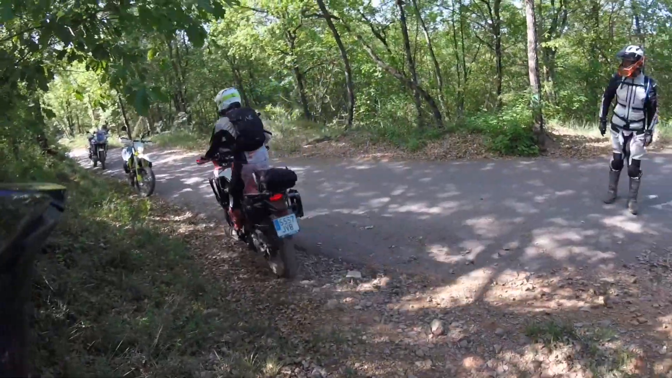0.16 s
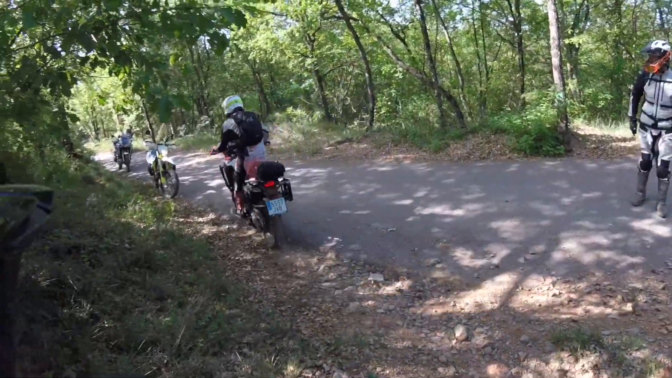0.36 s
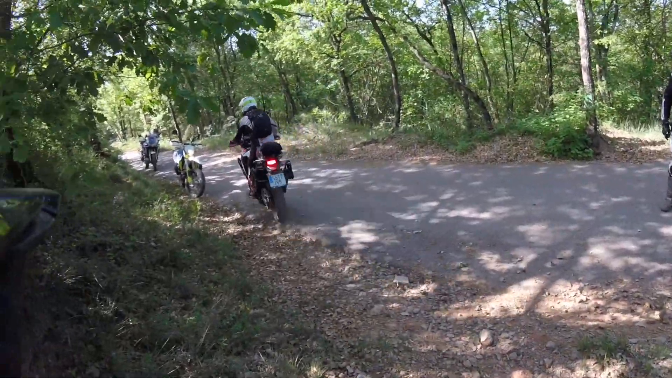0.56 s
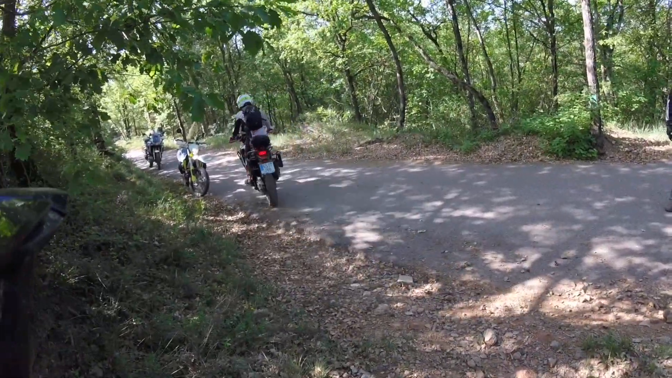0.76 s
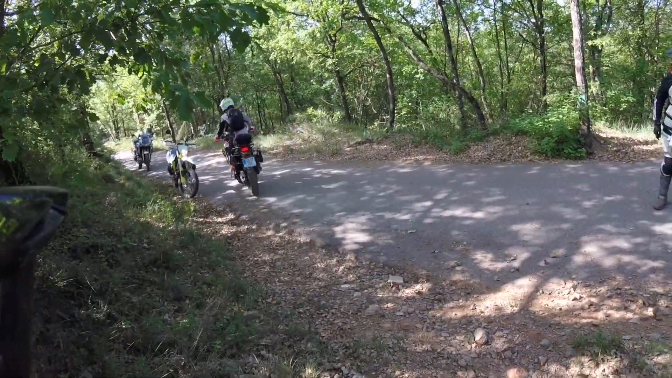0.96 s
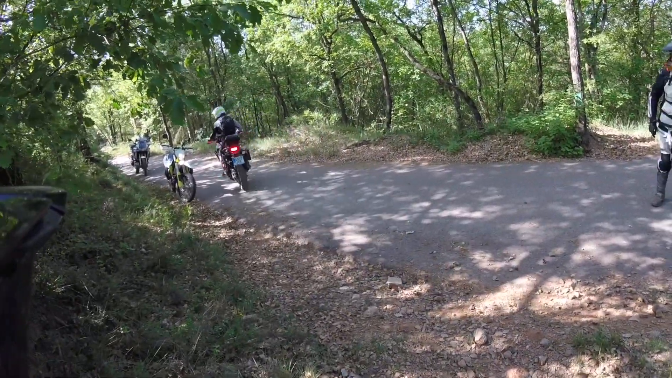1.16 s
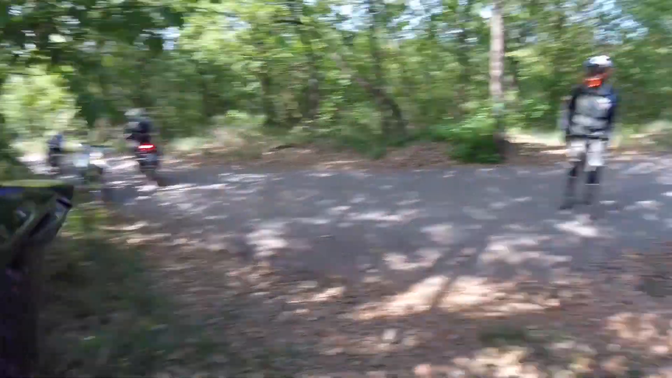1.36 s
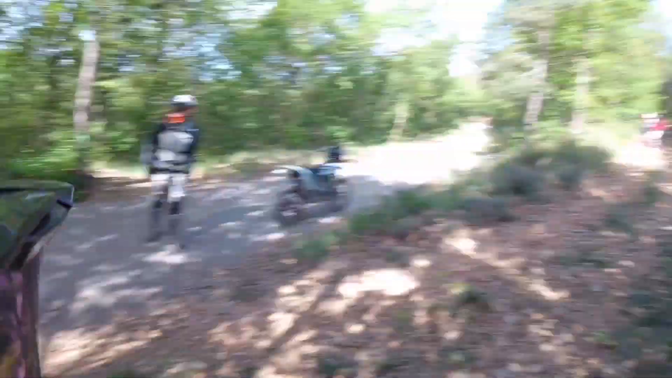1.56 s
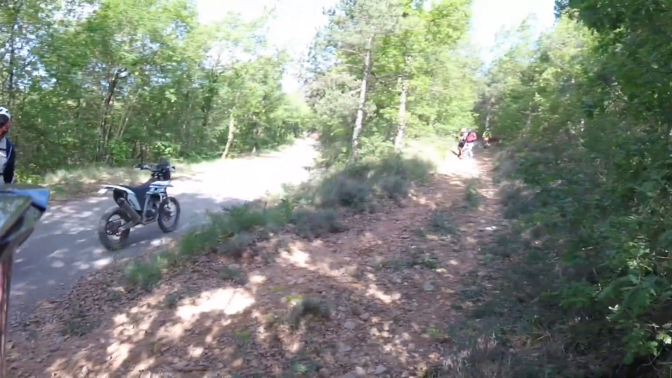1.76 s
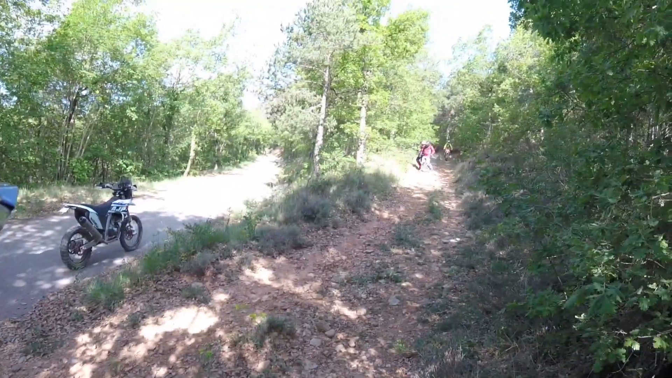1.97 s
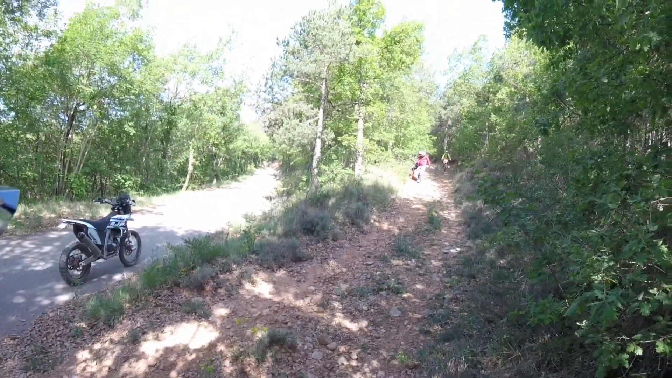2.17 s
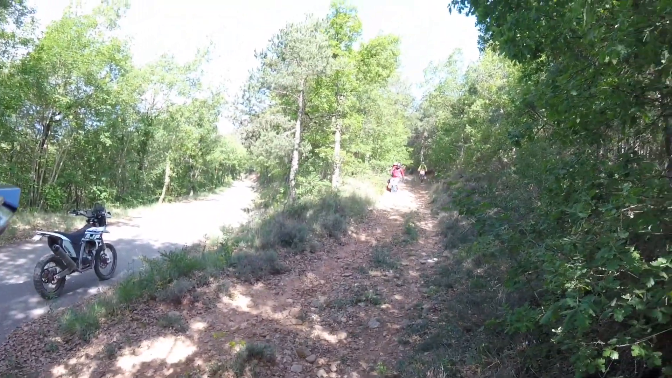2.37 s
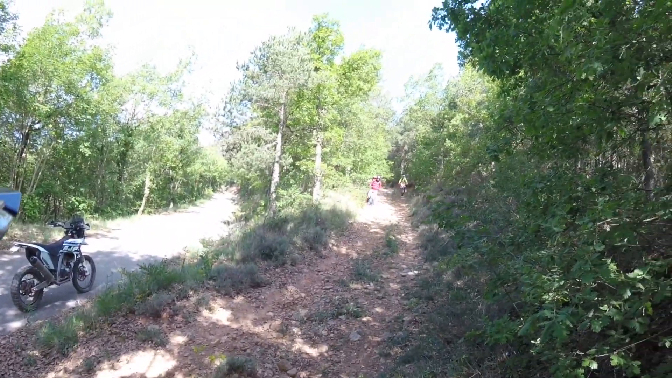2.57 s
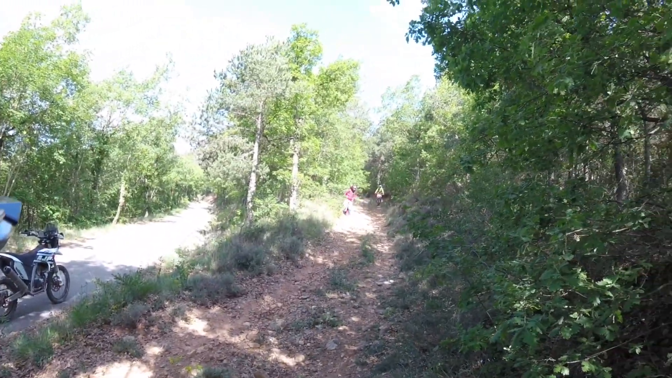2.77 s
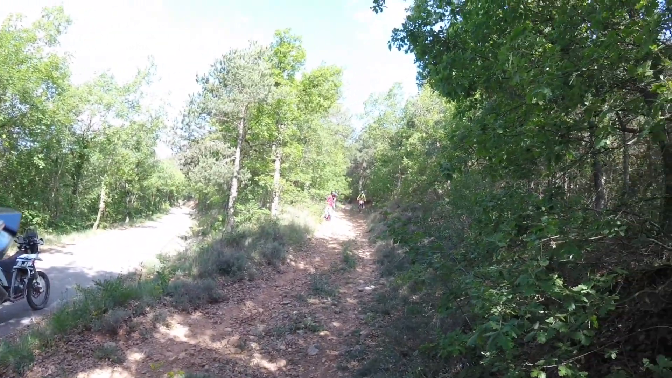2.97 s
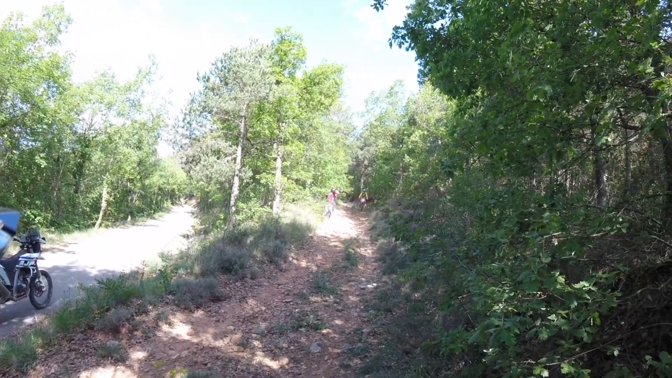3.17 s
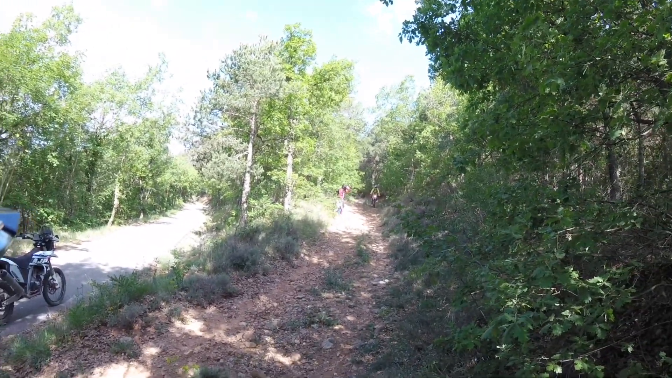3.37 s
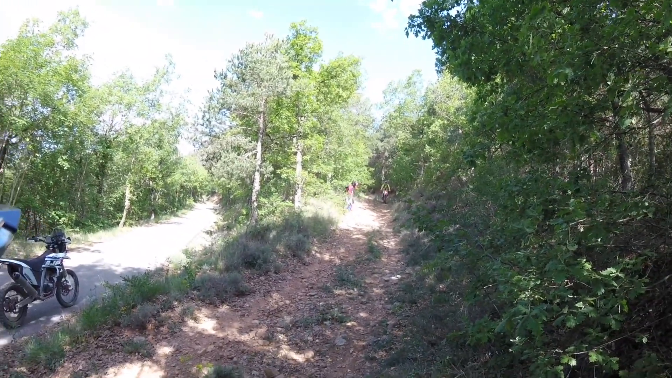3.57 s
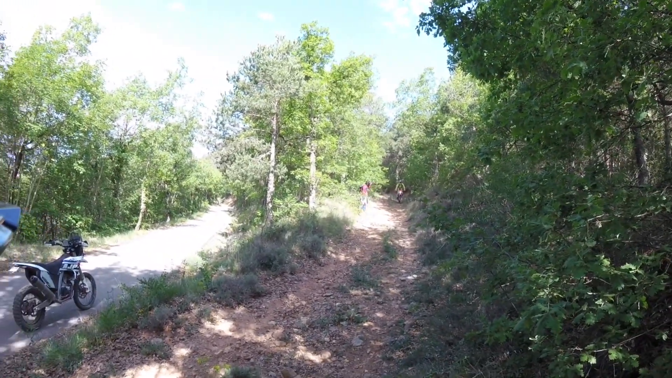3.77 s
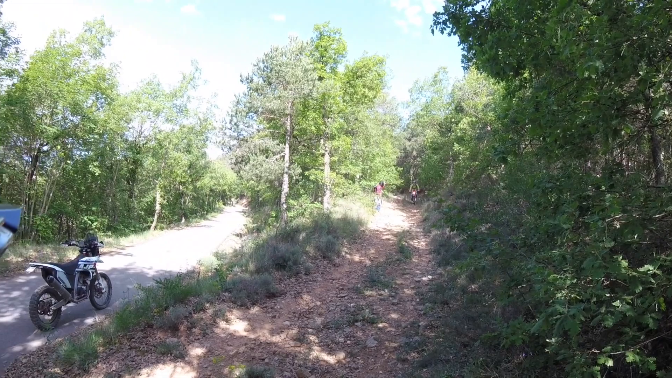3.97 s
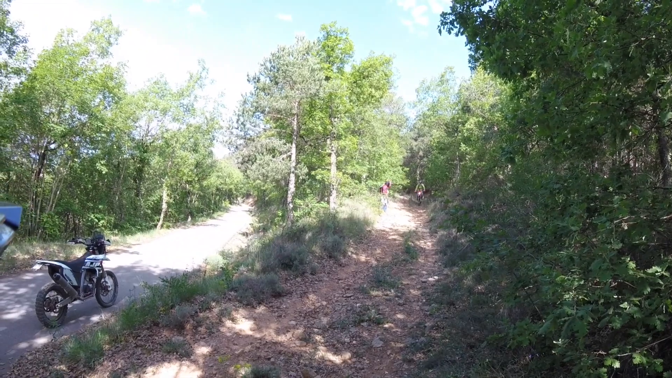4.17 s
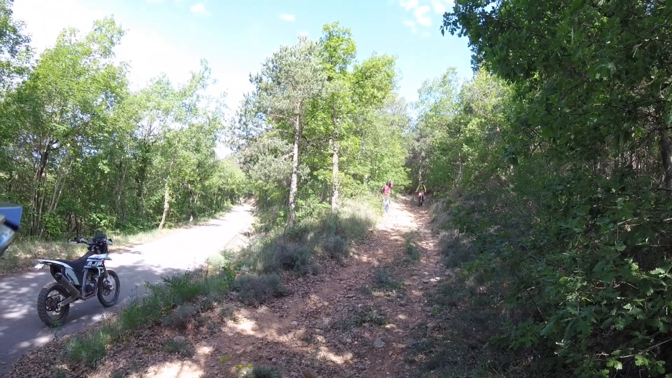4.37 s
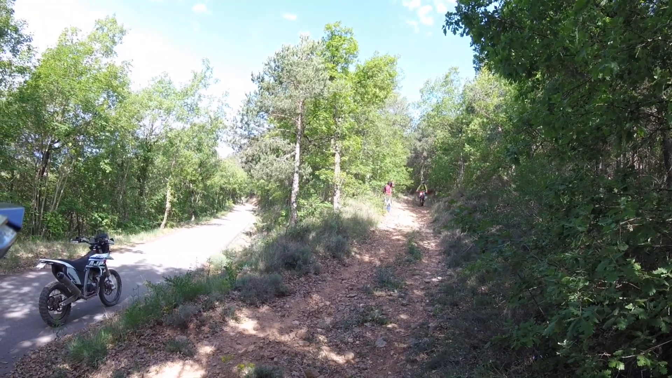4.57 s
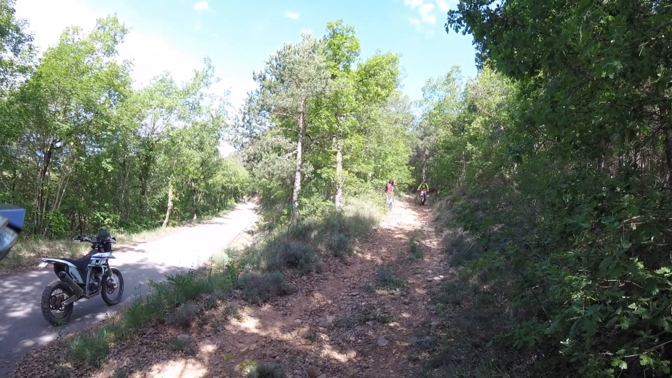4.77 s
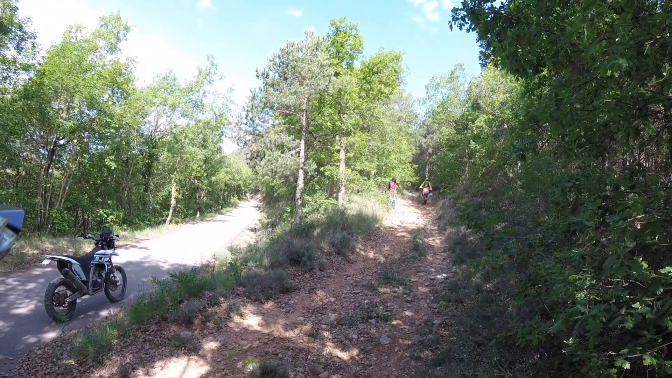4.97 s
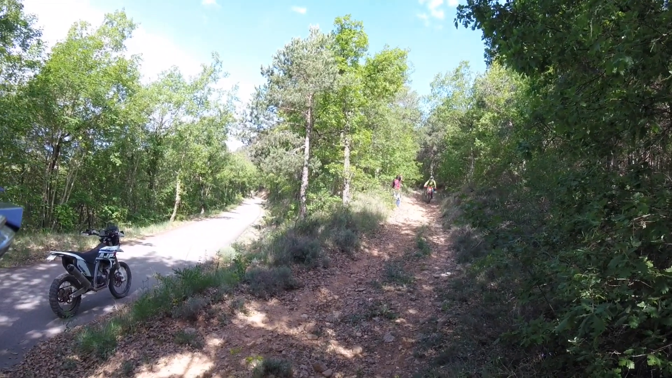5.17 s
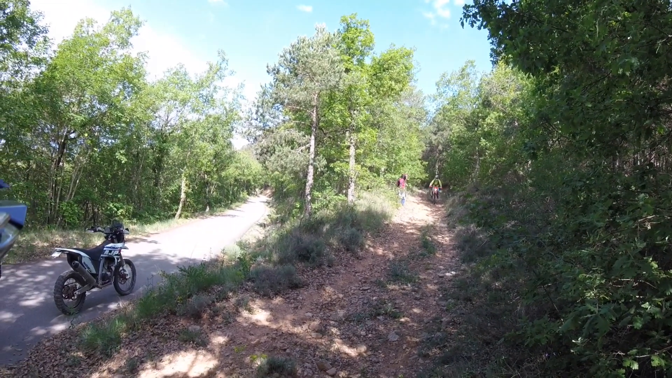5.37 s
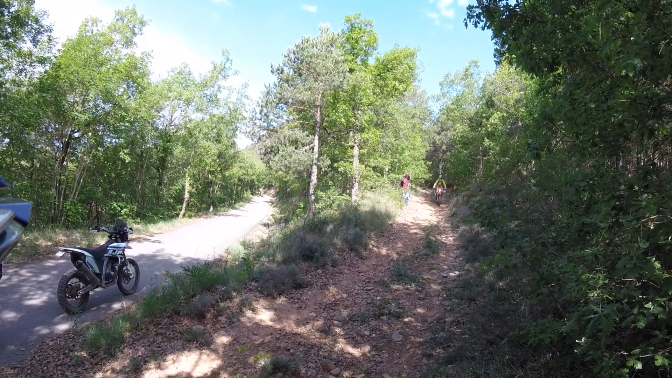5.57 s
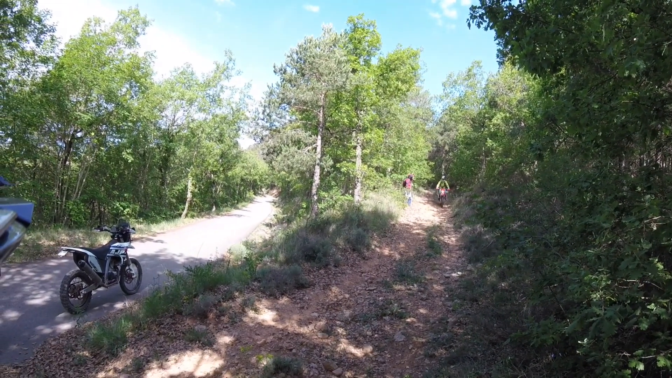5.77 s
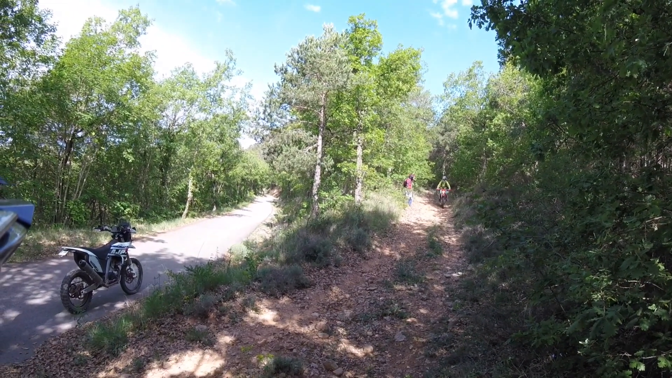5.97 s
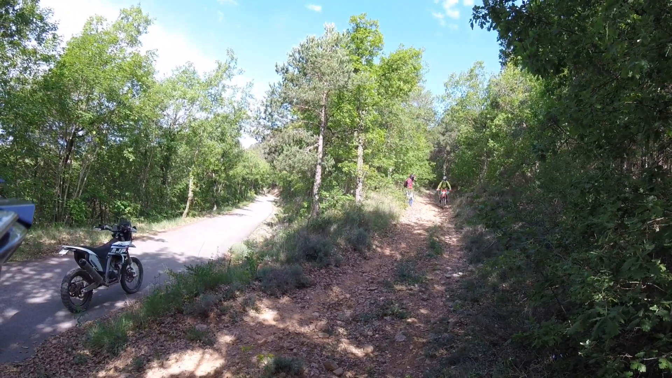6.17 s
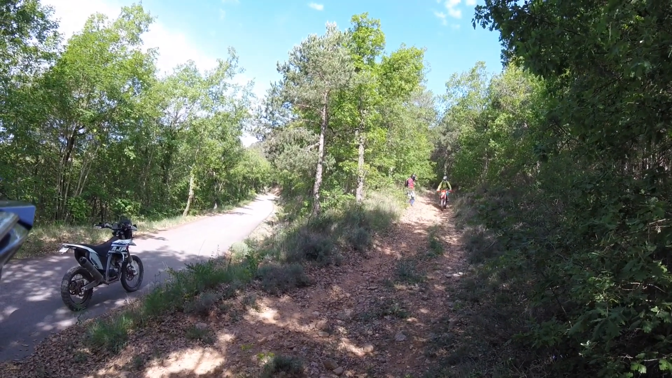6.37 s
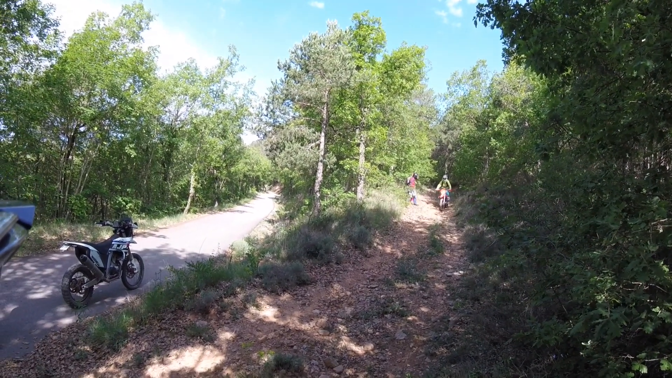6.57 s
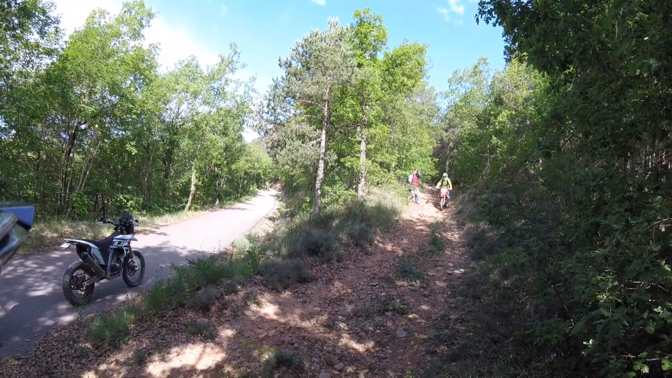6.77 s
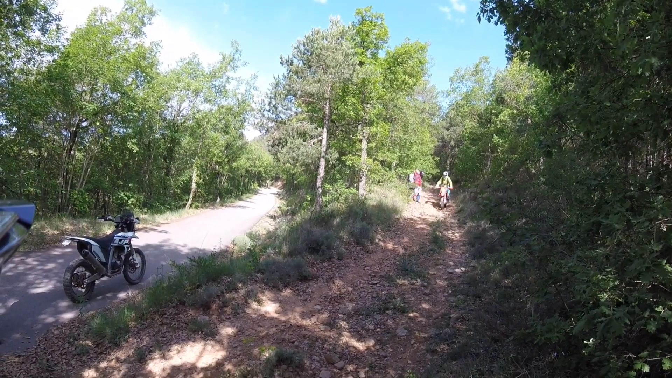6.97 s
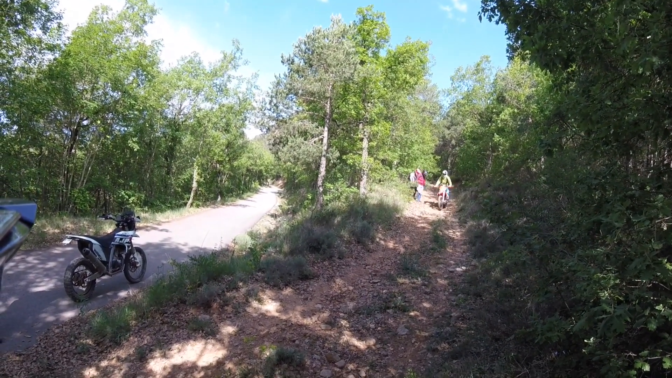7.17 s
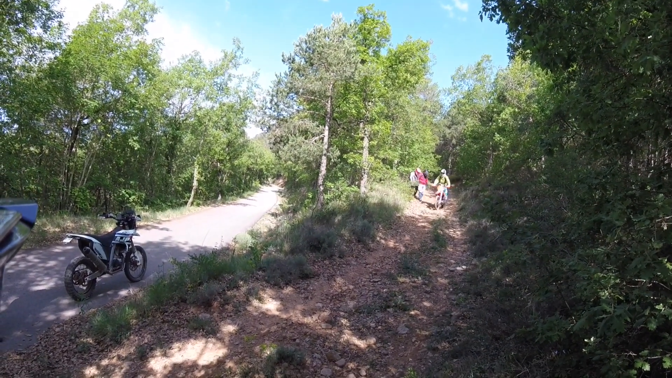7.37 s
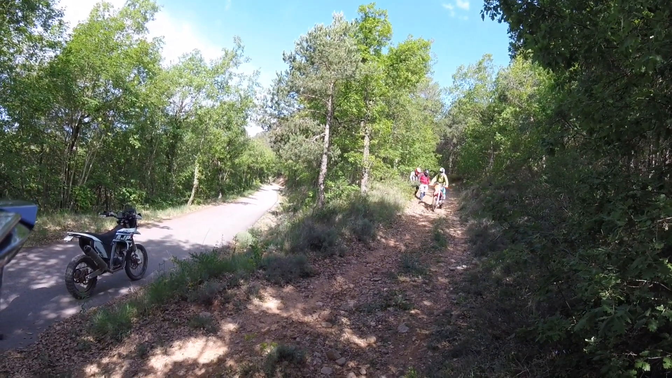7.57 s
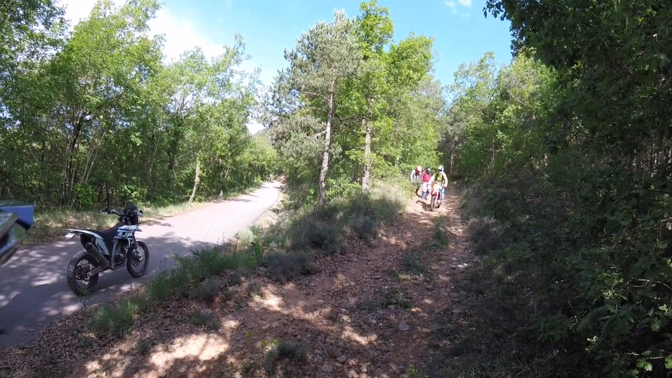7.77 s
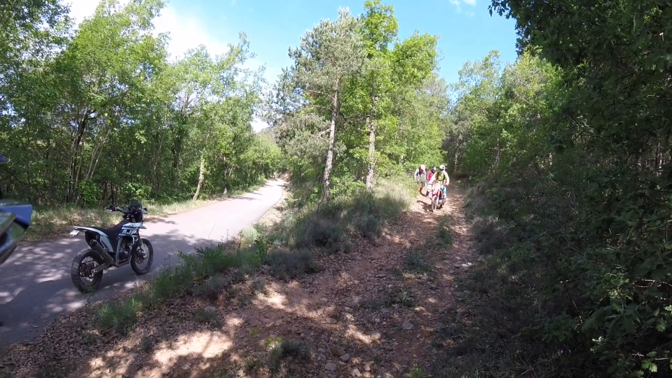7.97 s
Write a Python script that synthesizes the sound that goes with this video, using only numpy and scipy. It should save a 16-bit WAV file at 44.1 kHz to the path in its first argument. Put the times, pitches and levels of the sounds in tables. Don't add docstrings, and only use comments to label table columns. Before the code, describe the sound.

At 0 s a twin-cylinder motorcycle is close and pulling away on a forest track: deep, uneven paired exhaust beats, about ten to thirteen cycles a second, with a hollow pipe ring strongest near 0.5 s, needle-like valve ticks and tyres rustling dry leaves. A boot crunches grit and a hand knocks the camera around 0.1 s. At 1.4 s the camera swings away, with a soft sleeve rub; ticks and tyre noise dull. The throb stumbles on weak firings and fades from about 2.5 s to a far, lumpy idle. From 3 s bass steadily thins as a bird whistles short sliding notes until 6 s. From about 3.5 s a single-cylinder bike pops faster and sharper, growing louder with clatter and leaf rustle. Steps crunch at 3.8, 5.2-5.5 and 6.2-6.7 s, with a hard knock at 5.3 s; a flurry of crunches and plastic knocks closes 7.6-8 s. Faint microphone hiss.

```python
import sys
import numpy as np
from scipy import signal
from scipy.fft import rfft, irfft, next_fast_len
from scipy.io import wavfile
from scipy.ndimage import uniform_filter1d, map_coordinates

SR = 44100
rng = np.random.default_rng(int(sys.argv[2]) if len(sys.argv) > 2 else 0)


def inscribe(sig):
    pcm = np.round(np.clip(np.atleast_2d(sig).T, -1, 1) * 32767)
    wavfile.write(sys.argv[1], SR, pcm.astype(np.int16))


def convert_level_to_amplitude(level_db):
    exponent = np.asarray(level_db, float) / 20
    return 10 ** exponent


N = 353373
T = np.arange(N) / SR
LEAD = SR // 8
SECOND_FIRING = .367


def unit(x):
    return x / np.sqrt(np.mean(x ** 2) + 1e-20)


def along(points, hz):
    f, v = np.transpose(points)
    return np.interp(np.log(hz + 1), np.log(f + 1), v)


def curve(rows, column=1):
    rows = np.array(rows)
    return np.interp(T, rows[:, 0], rows[:, column])


def ramp_db(level_db, start_s, db_per_s):
    return level_db + db_per_s * np.maximum(T - start_s, 0)


def swells(rows):
    return sum(convert_level_to_amplitude(db) * np.exp(-((T - s) / half) ** 2) for s, db, half in rows)


def wander(points, per_s):
    return map_coordinates(rng.standard_normal(points), [T * per_s])


def filtered(x, response):
    m = next_fast_len(len(x) + SR // 2)
    return irfft(rfft(x, m) * response(np.fft.rfftfreq(m, 1 / SR)), m)[:len(x)]


def coloured(x, spectrum):
    return unit(filtered(x, lambda hz: convert_level_to_amplitude(along(spectrum, hz))))


def grains(gate, spiky_db):
    size = convert_level_to_amplitude(spiky_db * rng.exponential(size=N // 40 + 1).clip(0, 3.5))
    return gate * np.repeat(size, 40)[:N] * rng.standard_normal(N)


def firings(cycles, scatter_db):
    whole = np.floor(cycles)
    fired = np.diff(whole, prepend=whole[0]) > 0
    return fired * convert_level_to_amplitude(scatter_db * rng.standard_normal(200)[whole.astype(int) % 200])


def puffs(cycles, fade, steady):
    return steady + np.exp(-(cycles % 1) / fade)


def pipe(blows, modes, soft_hz):
    def response(f):
        ring = sum(p * convert_level_to_amplitude(db) * w * c / (c * c - f * f + 1j * f * w) for c, w, db, p in modes)
        no_dc = 1j * f / (12 + 1j * f)
        return ring * no_dc / (1 + 1j * f / soft_hz) ** 2
    return unit(filtered(blows, response))


def facing():
    turn_s, spread_s = 1.4, 0.025
    return 1 / (1 + np.exp((T - turn_s) / spread_s))


def receding_db():
    double_distance_s = 0.51
    return -20 * np.log10(1 + T / double_distance_s)


# (frequency [Hz], density [dB per Hz])
HISS_SPECTRUM = [(1000, -18), (4000, -4), (10000, -2.5), (12500, -10.5), (14500, -13), (15300, -22)]


def microphone_hiss():
    return convert_level_to_amplitude(-62.0) * coloured(rng.standard_normal(N), HISS_SPECTRUM)


# (start [s], length [s], first pitch [Hz], last pitch [Hz], level [dB])
BIRD_NOTES = [(3.07, 0.13, 2950, 2820, -62), (3.272, 0.15, 2400, 2790, -61), (3.66, .07, 2250, 2310, -62),
              (3.785, 0.086, 2336, 2630, -58), (4.105, .02, 3350, 3080, -60),
              (4.132, .025, 3320, 3270, -54), (4.238, 0.088, 3520, 3650, -66),
              (4.423, 0.031, 2075, 2820, -55), (4.46, 0.049, 2830, 2970, -55), (4.58, .08, 3110, 3460, -54),
              (4.743, .055, 3970, 4150, -59), (4.876, 0.028, 3380, 3160, -55),
              (4.989, 0.075, 2950, 2220, -54), (5.21, 0.031, 3850, 3770, -61),
              (5.272, 0.071, 2800, 2720, -56), (5.43, 0.021, 3830, 3730, -57),
              (5.455, 0.045, 3650, 2780, -55), (5.49, .045, 2720, 2700, -56), (5.6, .05, 4300, 4070, -56.5),
              (5.652, .02, 4180, 3700, -59), (5.802, 0.074, 3170, 3255, -51.5),
              (5.872, 0.028, 3400, 3310, -51), (5.925, .04, 3350, 3310, -61),
              (5.963, 0.05, 2520, 2700, -58)]


def bird():
    drop_early = .25
    out = np.zeros(N)
    for s, length, first_hz, last_hz, db in BIRD_NOTES:
        u = np.linspace(0, 1, round(length * SR))
        sag = 4 * drop_early * max(first_hz - last_hz, 0) * u * (1 - u)
        pitch = first_hz + (last_hz - first_hz) * u - sag
        swell = np.sin(np.pi * u) ** 0.45
        out[round(s * SR):][:len(u)] += convert_level_to_amplitude(db + 6) * swell * np.sin(2 * np.pi * np.cumsum(pitch) / SR)
    out = out * convert_level_to_amplitude(1.2 * wander(500, per_s=60))
    trees = rng.standard_normal(SR // 4) * convert_level_to_amplitude(-60 * T[:SR // 4] / 0.54)
    return out + convert_level_to_amplitude(-5.5) * signal.fftconvolve(out, trees / np.linalg.norm(trees))[:N]


# (frequency [Hz], density [dB per Hz])
LITTER_SPECTRUM = [(2240, -48), (3800, -8.5), (4490, -15), (5520, 2), (5880, 4.5), (6410, -1.5), (6990, -7),
                   (10200, -14.5), (11300, -24.5), (15000, -38)]
# (time [s], level [dB], half length [s])
FOOT_SCUFFS = [(2.25, -49, 0.05), (2.37, -51.5, 0.051), (2.76, -51, 0.085), (3.08, -51, 0.068),
               (3.165, -61, 0.024), (3.4, -58.5, 1), (4.067, -58, 0.06), (6.62, -50.5, 0.18),
               (7.24, -52, 0.27), (7.68, -44, 0.027), (7.79, -44.5, 0.056), (7.82, -57, .12)]


def leaf_litter():
    clumps = wander(400, per_s=35)
    tyre_db, shadow_db = -35.5, -4.5
    leaving = convert_level_to_amplitude(tyre_db + receding_db() + shadow_db * (1.5 - facing()))
    coming = convert_level_to_amplitude(ramp_db(-59, start_s=4, db_per_s=1.93))
    level = np.sqrt(leaving ** 2 + coming ** 2 + swells(FOOT_SCUFFS) ** 2)
    return level * convert_level_to_amplitude(clumps) * coloured(grains(1, spiky_db=1.5), LITTER_SPECTRUM)


# (frequency [Hz], density [dB per Hz])
GRIT_SPECTRUM = [(300, -34), (1100, 10.5), (1600, -0.5), (2100, 2), (3300, -7), (4300, -11.5), (5800, 7.5),
                 (7000, -10), (10000, -19), (14000, -58)]
# (time [s], peak level [dB], decay by 60 dB [s])
BOOT_FALLS = [(0.069, -12.5, 0.031), (0.1107, -19, 0.06), (0.3576, -23.5, 0.064), (0.9323, -35, 0.053),
              (3.827, -20.5, 0.042), (5.245, -27.5, 0.099), (5.5414, -23.5, 0.058), (6.1544, -22, 0.067),
              (6.3063, -21.5, 0.051), (6.61, -30, 0.065), (6.6792, -22, 0.039), (7.643, -16, 0.067),
              (7.7034, -22.5, 0.049), (7.761, -21, 0.071), (7.8381, -28.5, 0.046), (7.956, -33.5, 0.13)]


def boots():
    rise_s = 0.0026
    gate = np.zeros(N + SR)
    t = T[:SR // 2]
    for s, db, t60 in BOOT_FALLS:
        burst = convert_level_to_amplitude(db - 60 * t / max(t60, .01))
        scatter = convert_level_to_amplitude(db - 26.5 - 60 * t / 1.3)
        gate[round(s * SR):][:len(t)] += (burst + scatter) * (1 - np.exp(-t / rise_s))
    return convert_level_to_amplitude(-5) * gate[:N] * coloured(grains(1, spiky_db=1.8), GRIT_SPECTRUM)


# (time [s], peak level [dB], pitch [Hz], decay by 60 dB [s])
HAND_KNOCKS = [(.111, -10, 408, 0.02), (5.2834, -7.5, 422, 0.0089), (5.45, -28, 496, 0.02),
               (5.778, -24, 283, .03), (7.664, -24.5, 330, 0.084), (7.689, -17, 434, 0.022),
               (7.855, -19.5, 417, 0.043), (7.87, -15, 303, 0.016), (7.8858, -9.5, 413, 0.015),
               (7.9729, -14, 310, 0.03), (7.981, -20, 375, 0.056)]
# (time [s], level [dB], half length [s])
SLEEVE_RUBS = [(.01, -32.5, 0.02), (.13, -34, 0.13), (1.4, -42, 0.39), (2.4, -45.5, 0.12),
               (3.85, -42, 0.061), (6.17, -49, 0.017), (5.31, -40, 0.047), (5.37, -39.5, 0.024),
               (5.46, -34.5, 0.036), (6.33, -40, 0.22), (7.7, -32.5, 0.039), (7.78, -39.5, 0.031),
               (7.86, -35, 0.06), (7.97, -32.5, 0.03)]
# (frequency [Hz], density [dB per Hz])
CLOTH_SPECTRUM = [(150, -41), (280, -2), (450, -1.5), (600, -11.5), (1100, -18.5), (1600, -21), (3000, -52)]


def knocks():
    rise_s = 0.00048
    out, t = np.zeros(N + SR), T[:SR // 8]
    for s, db, hz, t60 in HAND_KNOCKS:
        ring = np.sin(2 * np.pi * hz * t) + 0.059 * np.sin(2 * np.pi * 1.7 * hz * t)
        out[round(s * SR):][:len(t)] += convert_level_to_amplitude(db - 60 * t / t60) * (1 - np.exp(-t / rise_s)) * ring
    return out[:N] + swells(SLEEVE_RUBS) * coloured(grains(1, spiky_db=5), CLOTH_SPECTRUM)


# (frequency [Hz], density [dB per Hz])
TAPPET_SPECTRUM = [(3500, -34), (5000, 2), (5900, 6), (7000, -13), (9500, -11), (10800, -7.5), (11500, -31),
                   (15000, -39)]


def tappets():
    strikes = firings(7 * curve(TWIN_CRANK), scatter_db=3)
    gate = signal.fftconvolve(strikes, convert_level_to_amplitude(-60 * T[:SR // 50] / 0.018))[:N]
    return convert_level_to_amplitude(-47.0 - 3.1 * T) * facing() * coloured(gate * rng.standard_normal(N), TAPPET_SPECTRUM)


# (frequency [Hz], density [dB per Hz])
NEAR_GEAR_SPECTRUM = [(500, -67), (750, -6.5), (930, -6), (1060, -8), (1470, -7.5), (1790, 1.5), (2140, -5),
                      (3200, -12), (4300, -51), (6000, -65)]
# (frequency [Hz], density [dB per Hz])
FAR_GEAR_SPECTRUM = [(500, -45), (775, -6), (1050, 3.5), (1300, 0), (1680, -5), (2100, -1), (2500, -8),
                     (3270, -6.5), (4320, -27), (6000, -73)]


def valve_gear():
    near_ticks = puffs(9 * curve(TWIN_CRANK), fade=0.57, steady=0.68)
    far_ticks = puffs(7 * curve(SINGLE_CRANK), fade=1.0, steady=4.5)
    near = coloured(grains(near_ticks, spiky_db=2.0), NEAR_GEAR_SPECTRUM)
    far = coloured(grains(far_ticks, spiky_db=3.0), FAR_GEAR_SPECTRUM)
    spreading, shadow_db = 0.7, -6.5
    near_db = -38 + spreading * receding_db() + shadow_db * (1 - facing())
    far_db = ramp_db(-51.5, start_s=2.95, db_per_s=1.43)
    return convert_level_to_amplitude(near_db) * near + convert_level_to_amplitude(far_db) * far


# (time [s], engine cycles completed)
SINGLE_CRANK = [(-0.0706, 0), (3.6144, 58), (4.2957, 69), (4.8387, 78), (5.0897, 82), (5.2185, 84),
                (5.5536, 89), (6.1978, 99), (6.5294, 104), (6.8556, 109), (7.4964, 119), (8.0261, 127)]
# (time [s], level [dB])
SINGLE_LEVEL = [(0, -32), (1.5, -45.5), (2.8, -45), (3.5, -45.5), (4, -40), (4.5, -37.5), (5.5, -34.5),
                (6.5, -33), (8, -28.5)]
# (frequency [Hz], width [Hz], level [dB], polarity [+1 or -1])
SINGLE_PIPE = [(65, 30, -30, 1), (134, 21, -27.8, -1), (193, 31, -24.6, -1), (272, 66, -28, 1),
               (399, 60, -33.5, -1), (520, 110, -42, 1)]
# (frequency [Hz], density [dB per Hz])
SINGLE_BREATH = [(40, -20), (130, 3.5), (220, 2), (380, -5.5), (550, -12.5), (800, -17.5), (1500, -80)]


def single():
    cycles = curve(SINGLE_CRANK) - .012 + .009 * wander(100, per_s=9)
    blows = firings(cycles, scatter_db=.9)
    blows = blows + .42 * np.roll(blows, round(.0091 * SR))
    gate = puffs(cycles, fade=0.65, steady=1.0)
    breath = coloured(gate * rng.standard_normal(N), SINGLE_BREATH)
    return convert_level_to_amplitude(curve(SINGLE_LEVEL)) * (pipe(blows, SINGLE_PIPE, soft_hz=4000) + convert_level_to_amplitude(-7.5) * breath)


# (engine cycle, level change [dB])
MISFIRES = [
    (13, -14),
    (15, -12),
    (22, -5),
    (24, -26),
    (26, -6),
    (29, -13),
    (31, -4),
    (36, -8),
    (39, -4),
]


def burn_db(cycles):
    rebound_db = 1
    whole = np.floor(cycles)
    return sum(loss_db * (whole == c) + rebound_db * (whole == c + 1) for c, loss_db in MISFIRES)


# (time [s], level [dB], half length [s])
RING_AIM = [
    (.45, -35.5, 0.52),
    (1.9, -50, 0.98),
]
# (time [s], level [dB], half length [s])
WHISTLE_AIM = [
    (.75, -52.5, 0.32),
    (1.9, -53.5, .8),
]


def twin_end_tube(cycles):
    gas = 0.029 * puffs(cycles, fade=1.0, steady=0) * rng.standard_normal(N)
    first = firings(cycles - .025, scatter_db=.5)
    blows = first + .3 * firings(cycles - SECOND_FIRING, scatter_db=3)
    ring = pipe(blows + gas, [(553.5, 42, 11, 0.74), (447, 71, -1.0, -0.47)], soft_hz=1500)
    whistle = pipe(gas, [(880, 33, -12.5, 1), (977, 42, -18.5, -1.0)], soft_hz=3000)
    whistle = filtered(whistle, lambda f: f > 700)
    return swells(RING_AIM) * ring + swells(WHISTLE_AIM) * whistle


# (time [s], engine cycles completed)
TWIN_CRANK = [(-.157, -1), (0.2352, 3), (0.5388, 6), (0.7377, 8), (0.9294, 10), (1.2242, 13), (1.5285, 16),
              (2.1228, 22), (2.6351, 27), (3.8356, 39), (4.4493, 45), (8.0491, 81)]
# (time [s], level [dB])
TWIN_LEVEL = [(0, -13.5), (.5, -13.5), (1.5, -15.5), (2.4, -18), (2.7, -18.5), (3.5, -23), (4, -26.5),
              (5, -32), (6, -35), (7, -37.5), (8, -39)]
# (frequency [Hz], width [Hz], level [dB], polarity [+1 or -1])
TWIN_PIPE = [(38, 10, -1.8, 1), (48, 29, -5.3, -1), (80, 18, -9.2, -1), (129, 72, 6, 1), (135, 72, 5.9, -1),
             (150, 32, -10.6, 1), (216, 9, -25, 1)]
# (frequency [Hz], density [dB per Hz])
TWIN_BREATH = [(5, -18), (20, -11), (40, -33), (110, 9.5), (165, 5.5), (230, -7.5), (400, -16),
               (600, -20.5), (900, -28.5), (1500, -84)]


def twin():
    when = np.arange(-LEAD, N) / SR
    turns = np.interp(when, *np.transpose(TWIN_CRANK)) + .009
    hunt = map_coordinates(rng.standard_normal(100), [(when + 1) * 6])
    turns = turns + np.interp(when, [4.2, 5.2], [0, .04]) * hunt
    lumpy_db = np.interp(when, [1, 2.4], [.6, 1.2])
    first = firings(turns, scatter_db=lumpy_db)
    second = firings(turns - SECOND_FIRING, scatter_db=lumpy_db)
    burnt = convert_level_to_amplitude(burn_db(turns - SECOND_FIRING))
    sigh = filtered(second * np.maximum(1 - burnt, 0), lambda f: 1 / (1 + 1j * f / 55.3) ** 2)
    second = second * burnt + sigh
    pulses = pipe(first + .92 * second, TWIN_PIPE, soft_hz=330)[LEAD:]

    cycles = turns[LEAD:] - .03
    gate = puffs(cycles, fade=0.09, steady=1.0)
    gate = gate + .5 * puffs(cycles - SECOND_FIRING, fade=0.68, steady=0)
    gate = gate * convert_level_to_amplitude(uniform_filter1d(burn_db(cycles - .337) / 8, size=400))
    breath = coloured(gate * rng.standard_normal(N), TWIN_BREATH)
    breath_db = np.minimum(ramp_db(-17.5, start_s=0, db_per_s=3), -4)
    return convert_level_to_amplitude(curve(TWIN_LEVEL)) * (pulses + convert_level_to_amplitude(breath_db) * breath) + twin_end_tube(cycles)


def scene():
    engines = twin() + single() + valve_gear() + tappets()
    return (engines + leaf_litter() + boots() + knocks() + bird())[None]


# (frequency [Hz], share of the cut)
WIND_FILTER_SHAPE = [(15, 1), (30, 0.86), (60, 1.08), (105, 0.62), (120, 0.81), (135, 0.049)]


def wind_filter(heard):
    rest_db, depth_db, start_s, time_s = -1.5, -38, 3.02, 3.7
    hz, t, z = signal.stft(heard, SR, nperseg=4096)
    closed = 1 - np.exp(-np.maximum(t - start_s, 0) / time_s)
    cut_db = along(WIND_FILTER_SHAPE, hz)[:, None] * (rest_db + depth_db * closed)
    return signal.istft(z * convert_level_to_amplitude(cut_db), SR, nperseg=4096)[1][:, :N]


def top_cut(x):
    return signal.sosfilt(signal.butter(12, 15180, fs=SR, output="sos"), x)


def record(dry):
    finished = wind_filter(dry + microphone_hiss())
    return top_cut(finished)


dry = scene()
out = record(dry)
inscribe(out)
```